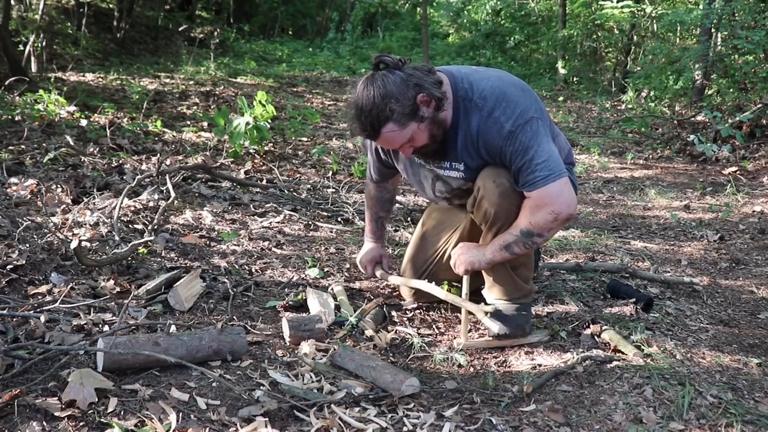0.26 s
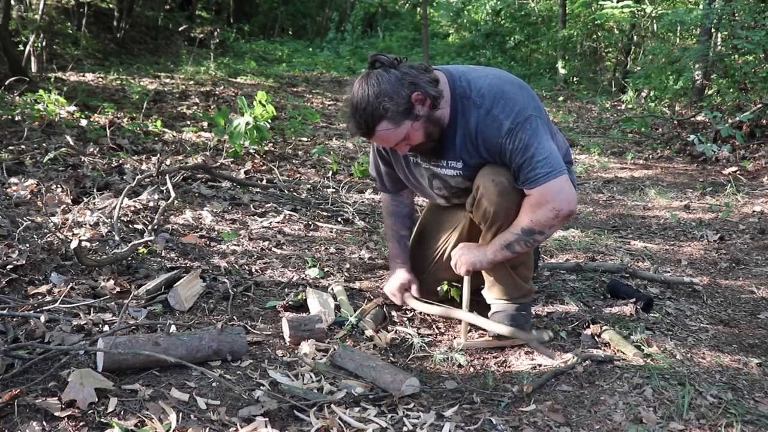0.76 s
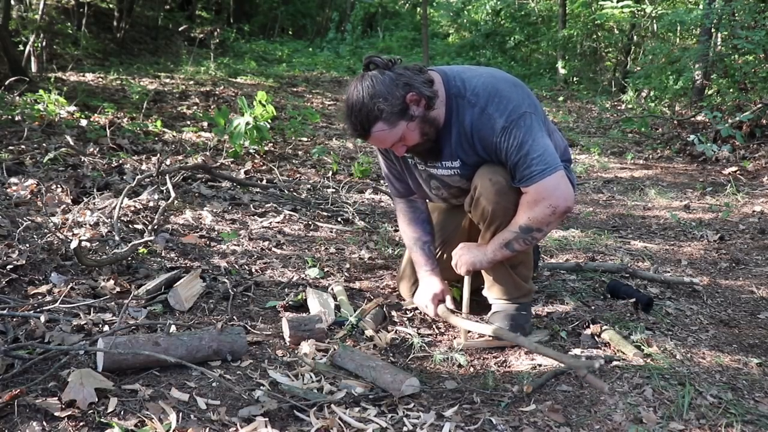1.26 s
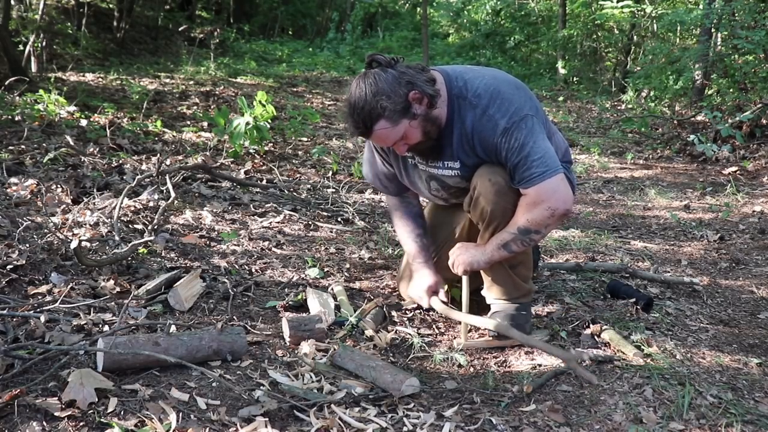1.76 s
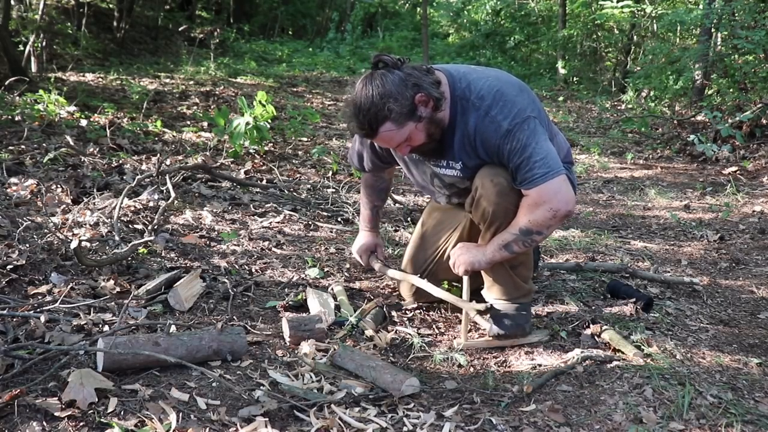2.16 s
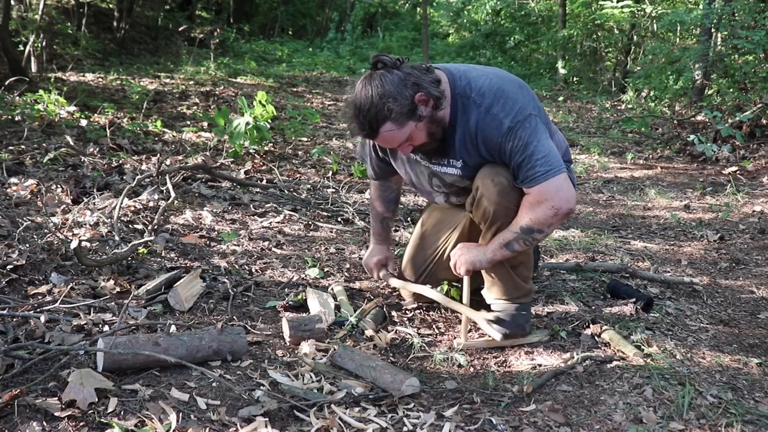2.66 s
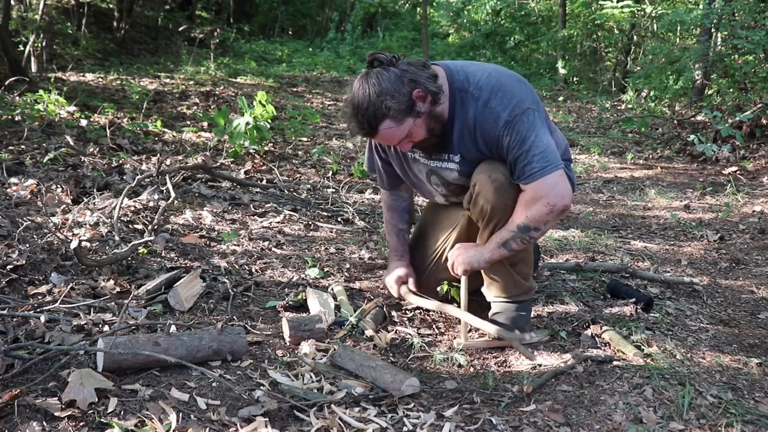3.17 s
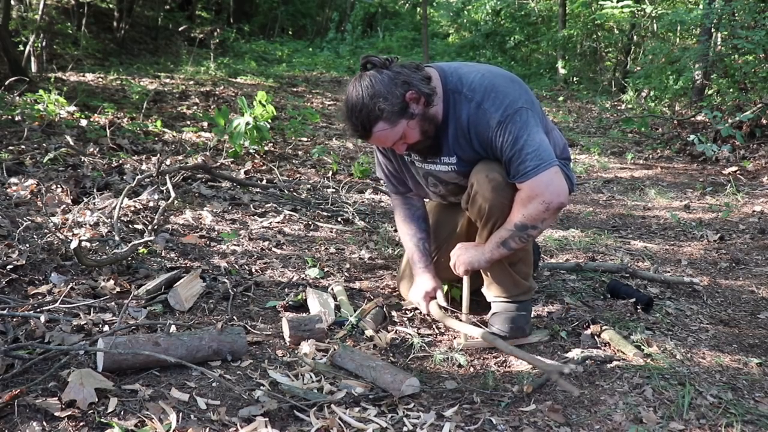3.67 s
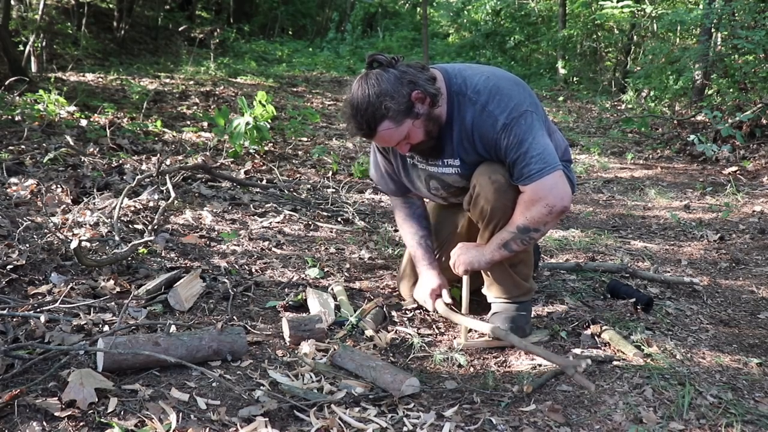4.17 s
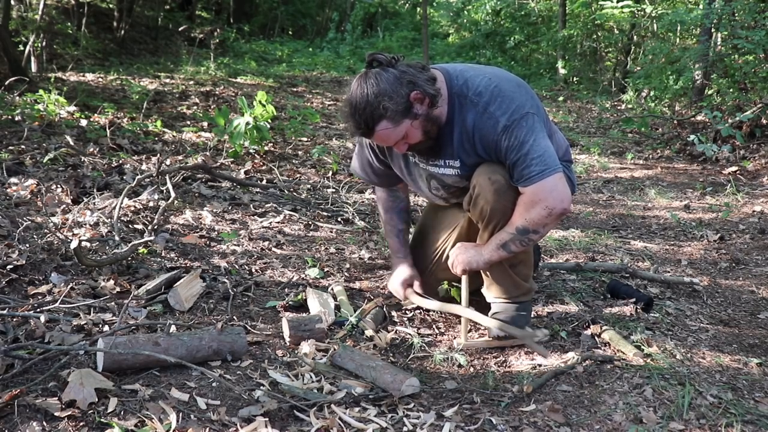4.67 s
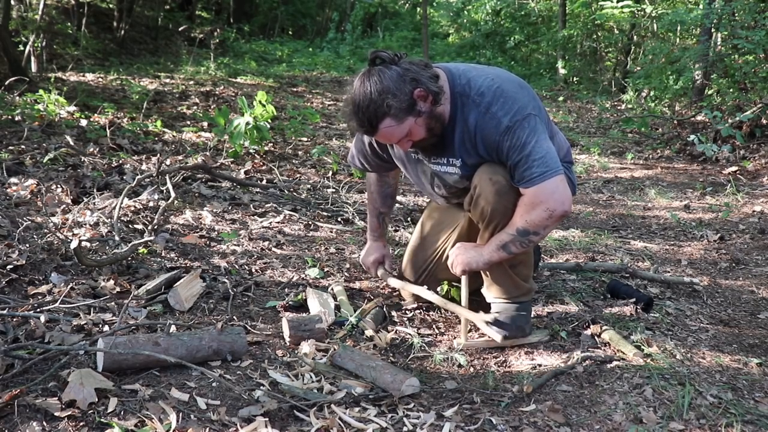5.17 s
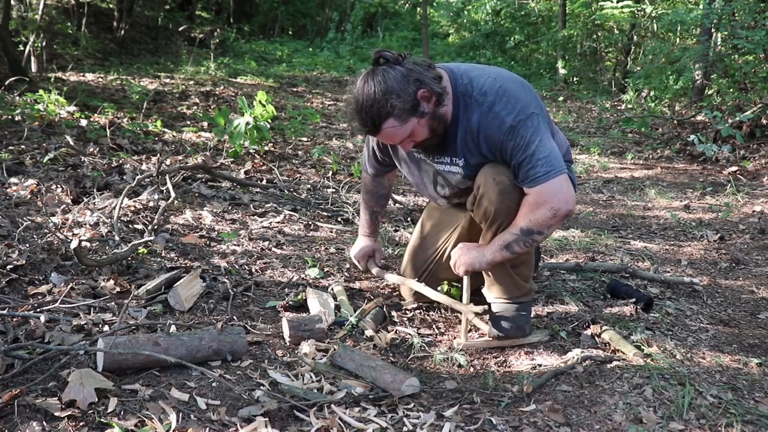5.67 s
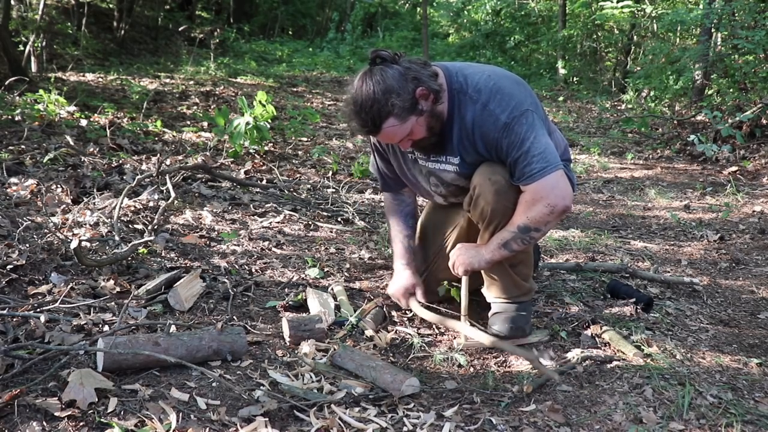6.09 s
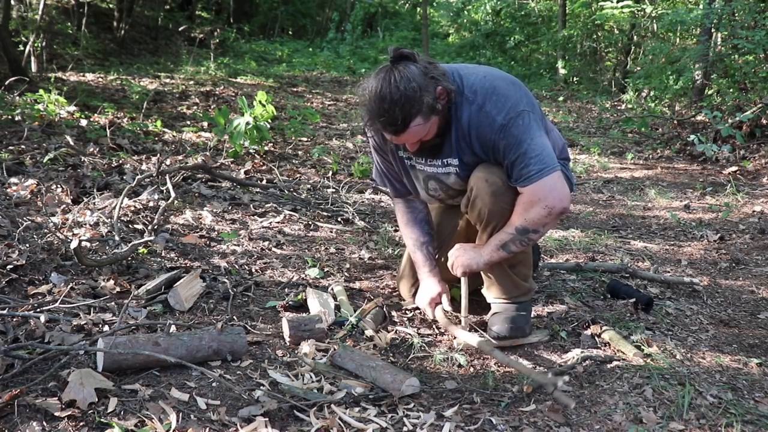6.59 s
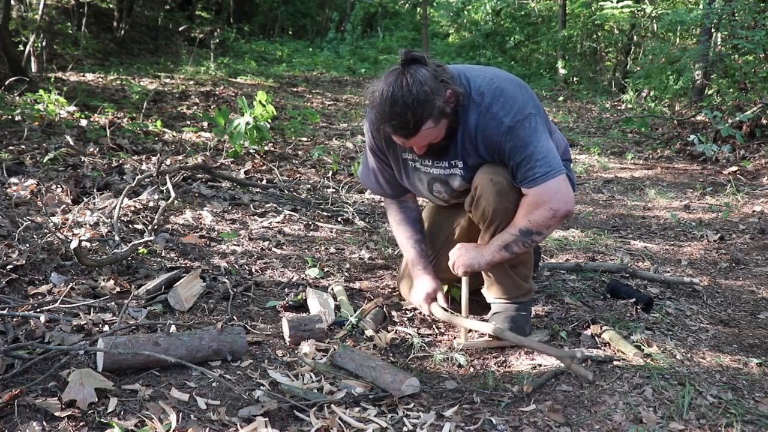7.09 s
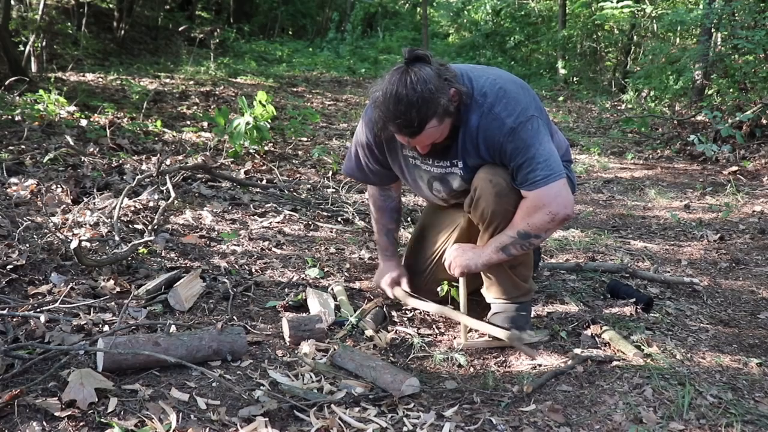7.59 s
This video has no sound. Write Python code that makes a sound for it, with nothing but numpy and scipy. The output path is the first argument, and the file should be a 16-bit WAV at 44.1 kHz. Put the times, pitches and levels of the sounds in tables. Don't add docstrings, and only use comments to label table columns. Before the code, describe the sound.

A bow drill works close by in a quiet, open wood, nearly without echo. Dry, hollow wooden rasps alternate push and pull, each about 0.2 seconds, a little over three per second, with tiny gaps. They grind low in the board, flutter with a fast knock at each spindle turn, and carry fine grit, crackle and hiss. The first two seconds are mostly plain rasping, with one hard wooden crack at 0.94. From about 1.9, reversals often stick, chatter in rapid bright clicks and lock into thin, very short squeaks, strong near 2.8, 3.7, 4.9, 5.8 and 6.1. Loud snaps catch around 5.1 and 5.7. Squeaking eases after 6.4, with a small one near 7.2, while sawing continues until the end. Very faint dove coos come around 1.5, 2.4, 3.3 and, higher, 7.2. A distant engine throbs deeply under soft air, slightly stronger towards the end.

```python
import sys
import numpy as np
from scipy import signal
from scipy.fft import rfft, irfft
from scipy.io import wavfile

SR = 44100
rng = np.random.default_rng(int(sys.argv[2]) if len(sys.argv) > 2 else 0)


def boost_factor(decibels):
    exponent = np.asarray(decibels, float) / 20
    return 10 ** exponent


def master(y):
    cut = np.clip(np.atleast_2d(y).T, -1, 1)
    pcm = np.round(cut * 32767)
    wavfile.write(sys.argv[1], SR, pcm.astype(np.int16))


N = 345826
CUTOFF_HZ = 15800

# start [s], end [s], rasp level [dB], grit level [dB].
STROKES = [(-0.2, 0.002, -21.5, -68), (0.096, 0.339, -25, -35.5), (0.416, 0.624, -27, -42),
           (0.721, 0.952, -25, -38), (1.04, 1.244, -24, -42.5), (1.34, 1.55, -22.5, -34.5),
           (1.641, 1.855, -24, -37.5), (1.938, 2.165, -23, -32.5), (2.242, 2.457, -27, -36.5),
           (2.558, 2.767, -25, -33.5), (2.87, 3.04, -24.5, -39.5), (3.15, 3.328, -25.5, -35),
           (3.416, 3.655, -28, -41), (3.723, 3.958, -25.5, -34.5), (4.047, 4.229, -22, -38),
           (4.324, 4.548, -24, -35.5), (4.63, 4.816, -23, -40.5), (4.915, 5.132, -22.5, -30.5),
           (5.22, 5.401, -21.5, -36.5), (5.5, 5.731, -23.5, -31.5), (5.8, 5.999, -25, -39),
           (6.081, 6.312, -25, -34), (6.41, 6.591, -20.5, -37), (6.693, 6.905, -25.5, -36),
           (6.999, 7.178, -22, -37.5), (7.272, 7.491, -25.5, -34.5), (7.58, 7.771, -22.5, -36)]


def at_times(rows):
    s, *columns = np.transpose(rows)
    return [np.interp(np.arange(N) / SR, s, c) for c in columns]


def unit(x):
    return x / np.sqrt(np.mean(x ** 2) + 1e-20)


def wander(per_s):
    r = np.exp(-2 * np.pi * per_s / SR)
    noise = rng.standard_normal(N + 9000)
    return unit(signal.lfilter([1], [1, -2 * r, r * r], noise)[9000:])


def grains(per_s, spread_db):
    sizes = boost_factor(spread_db * np.minimum(rng.exponential(1, N), 5))
    signs = rng.choice([-1, 1], N)
    return unit(sizes * signs * (rng.random(N) < per_s / SR)) + 1e-18


def puffs(times, heights, rise_s, fall_s):
    marks = np.zeros(N)
    marks[(np.asarray(times) * SR).astype(int)] = heights
    age = np.arange(int(0.06 * SR)) / SR
    shape = (1 - np.exp(-age / rise_s)) * np.exp(-age / fall_s)
    return signal.fftconvolve(marks, shape / shape.max())[:N]


def body(force, modes, shift_db, shift_per_s):
    out, power = 0, 0
    for k, (hz, width, db) in enumerate(modes):
        r = np.exp(-np.pi * width / SR)
        fed = force * boost_factor(shift_db * wander(shift_per_s))
        ringing = signal.lfilter([1, 0, -1], [1, -2 * r * np.cos(2 * np.pi * hz / SR), r * r], fed)
        out = out + (-1) ** k * boost_factor(db) * (1 - r * r) / 2 * ringing
        power += boost_factor(db) ** 2 * (1 - r * r) / 2
    return out / np.sqrt(power)


def stroke_levels():
    rasp_peak, grit_peak = (0.52, 0.5), (0.47, 0.64)
    swell_power, stop_power = (1.9, 4.2), (2.16, 4.64)
    time = np.arange(N) / SR
    rasp_db, grit_db = np.full(N, -90.), np.full(N, -90.)
    for k, (start, end, rasp_top, grit_top) in enumerate(STROKES):
        way = k % 2
        for level, place, top, drop in ((rasp_db, rasp_peak[way], rasp_top, 13),
                                        (grit_db, grit_peak[way], grit_top, 12)):
            middle = start + np.clip(place, 0.1, 0.9) * (end - start)
            rising = time < middle
            away = np.where(rising, (middle - time) / (middle - start), (time - middle) / (end - middle))
            power = np.where(rising, swell_power[way], stop_power[way])
            level[:] = np.maximum(level, top - drop * away ** power)
    return rasp_db, grit_db


def turn_knocks():
    # time [s], length of a turn [s], extra level [dB].
    knock_rows = [(0.222, 0.048, 5), (0.513, 0.03, 7.5), (0.842, 0.032, 6.5), (1.164, 0.03, 6),
                  (1.453, 0.031, 3), (1.763, 0.023, 6.5), (2.058, 0.034, 4.5), (2.348, 0.03, 9),
                  (2.657, 0.028, 5), (2.956, 0.022, 6), (3.248, 0.025, 6), (3.517, 0.033, 7.5),
                  (3.843, 0.029, 6), (4.13, 0.033, 4), (4.429, 0.036, 4.5), (4.745, 0.033, 7.5),
                  (5.026, 0.029, 3), (5.326, 0.0256, 7), (5.613, 0.026, 3.5), (5.924, 0.027, 7),
                  (6.195, 0.043, 6), (6.496, 0.025, 4), (6.78, 0.034, 4), (7.101, 0.026, 1.5),
                  (7.359, 0.032, 4.5), (7.692, 0.028, 4)]
    scatter_db, spin_up_s = 0.5, 0.03
    first_knock_db = (-0.5, -2.8)
    turns = np.arange(-4, 5)
    luck = rng.standard_normal((len(knock_rows), 9))
    s = np.array([at + turn_s * turns for at, turn_s, db in knock_rows])
    db = np.array(knock_rows)[:, 2:] + scatter_db * luck
    start, end = np.array(STROKES)[1:, :1], np.array(STROKES)[1:, 1:2]
    inside = (s > start + spin_up_s) & (s < end)
    stroke = np.arange(len(db))
    db[stroke, inside.argmax(axis=1)] += np.array(first_knock_db)[(stroke + 1) % 2]
    return s[inside], db[inside]


def rasp(rasp_db, grit_db):
    s, extra_db = turn_knocks()
    knock_db = 1.3 * puffs(s, extra_db, rise_s=0.003, fall_s=0.006)
    grip_db = 1.8 * wander(70)
    coarse = grains(6000, spread_db=1.5) * boost_factor(rasp_db + knock_db - 2.5 + grip_db)
    fine = grains(1500, spread_db=1.5) * boost_factor(grit_db + 0.47 * knock_db - 4.0 + grip_db)
    tear_level = signal.lfilter([1], [1, -0.96], np.abs(grains(170, spread_db=-5.5)))
    tears = tear_level * rng.standard_normal(N)
    crackle = unit(tears) * boost_factor(1.667 * grit_db + 11)
    dust_db = 0.68 * np.minimum(rasp_db, -36) - 23.5 + 2.0 * wander(99)
    dust = rng.standard_normal(N) * boost_factor(dust_db)
    highpass = signal.butter(2, 6500, "high", fs=SR, output="sos")
    hiss = signal.sosfilt(highpass, dust + crackle)
    return coarse, fine + boost_factor(8) * crackle, hiss


def swell_db(since, length, peak):
    build_db_per_s, ease_db_per_s = 402, 300
    top = np.clip(peak, 0, 1) * length
    return np.where(since < top, build_db_per_s * (since - top), ease_db_per_s * (top - since))


def chatter():
    # time [s], bright
    # level [dB], spindle level [dB].
    run_bursts = [(2.4737, -26, -27), (2.4775, -22, -23), (2.4823, -19, -21), (2.5011, -25, -29),
                       (2.504, -26, -28), (2.508, -22, -22), (2.512, -17, -23), (2.5157, -19, -21),
                       (2.5192, -22, -22), (2.5241, -21, -22), (2.5277, -20, -23), (2.5326, -13, -25),
                       (2.806, -31, -27), (2.81, -24, -29), (2.814, -20, -25), (2.818, -24, -27), (2.8233, -24, -29),
                       (2.829, -26, -27), (2.8333, -31, -24), (2.8376, -23, -29), (3.071, -18, -27),
                       (3.0776, -16, -26), (3.0956, -29, -31), (3.0992, -31, -35), (3.105, -20, -26),
                       (3.1079, -18, -29), (3.1116, -18, -24), (3.348, -21, -25), (3.3521, -18, -20),
                       (3.3574, -21, -22), (3.3612, -22, -27), (3.3788, -19, -22), (3.3826, -20, -22),
                       (3.3868, -17, -22), (3.3903, -17, -20), (3.3968, -16, -23), (3.4008, -23, -27),
                       (3.4039, -24, -29), (3.408, -28, -32), (3.639, -29, -25), (3.643, -25, -33), (3.647, -20, -31),
                       (3.6521, -15, -29), (3.6567, -13, -22), (3.6622, -15, -24), (3.6834, -15, -31),
                       (3.6861, -14, -24), (3.6892, -9, -19), (3.6954, -16, -29), (4.2511, -29, -36),
                       (4.2556, -22, -25), (4.2607, -16, -24), (4.2791, -26, -38), (4.2832, -26, -33),
                       (4.2861, -17, -27), (4.2904, -17, -19.5),
                       (4.2943, -21, -23), (4.3078, -22, -18.5), (4.5712, -30, -37), (4.5744, -20, -25),
                  (4.5787, -18, -22.5), (4.5846, -16, -23), (4.5892, -17, -21), (4.5947, -19, -25),
                  (4.8438, -27, -21), (4.8467, -26, -32), (4.849, -21, -30), (4.8537, -17, -24),
                  (4.8588, -16, -21), (4.8738, -24, -38), (4.8758, -18, -26), (4.8786, -11, -27),
                  (4.882, -13, -23), (4.888, -14, -27), (5.43, -19, -40), (5.4376, -15, -19.5),
                  (5.4421, -17, -17), (5.4592, -32, -36), (5.4615, -16, -21), (5.465, -13, -20),
                  (5.4674, -12, -24), (5.471, -16, -25), (5.7598, -25, -27), (5.768, -21, -33), (6.017, -18, -28),
                  (6.0214, -14, -24), (6.0259, -15, -22), (6.0306, -15, -22), (6.0469, -20, -27),
                  (6.0492, -23, -25.5), (6.0568, -16, -23.5), (6.062, -15, -15), (6.3472, -30, -33),
                  (6.351, -26, -26), (6.356, -27, -28), (6.3614, -26, -29), (6.3668, -25, -27), (6.375, -21, -23),
                  (6.38, -13, -19), (6.386, -11, -19.5), (6.3913, -12, -16), (6.6484, -25, -28),
                  (6.6526, -22, -28), (6.6565, -22, -26), (6.6596, -23, -31), (6.6646, -21, -23),
                  (6.669, -27, -27), (7.2347, -25, -32), (7.247, -21, -23.5), (7.8269, -23.5, -37),
                  (0.985, -35, -29), (0.991, -30, -23.5), (0.9968, -30, -24)]
    gap_s, drag_db = 0.008, -9
    bright_db, spindle_db = -0.5, 1.5
    run = [(s, b + bright_db, d + spindle_db) for s, b, d in sorted(map(tuple, run_bursts))]
    drag = np.zeros((2, N))
    for (s, *db), (next_s, *next_db) in zip(run, run[1:]):
        if next_s - s < gap_s:
            span = np.arange(int(s * SR), int(next_s * SR))
            drag[:, span] = boost_factor(np.linspace(db, next_db, len(span)).T + drag_db)
    return run, drag


def slipping():
    # time [s], bright level [dB], spindle level [dB].
    snaps = [(.748, -46, -29), (.777, -44, -25), (.788, -38, -22), (.815, -42, -18), (.874, -46, -27),
             (.909, -48, -28), (0.274, -36, -16.5), (0.7997, -35, -20), (0.8242, -31, -19),
             (0.852, -38, -28), (1.3956, -35, -18.5), (2.0429, -24, -19.5), (2.048, -39, -13),
             (2.1083, -26, -15.5), (2.627, -32, -21), (2.656, -39, -17), (2.7034, -31, -30),
             (3.2473, -28, -21), (3.27, -30, -19), (4.5133, -30, -14), (4.524, -37, -16),
             (5.0236, -44, -25), (5.0675, -47, -27), (5.0765, -39, -26), (5.5286, -30, -15),
             (5.6517, -41, -18), (5.659, -27, -13), (5.6736, -30, -9.5), (5.6871, -25, -28),
             (5.6948, -36, -14), (5.7045, -32, -18), (6.1076, -24, -24), (6.15, -33, -17),
             (6.8312, -38, -16.5), (7.341, -28, -24), (7.3737, -29, -43)]
    slips = [(6.343, -36, -29), (3.677, -40, -27), (7.1, -27, -25), (5.4555, -38, -25), (4.275, -33, -30),
             (7.823, -31, -29.5), (7.8295, -24, -29), (7.23, -30, -26), (.98, -48, -40), (3.074, -23, -23),
             (5.9, -27, -30), (6.3725, -24, -24), (.9369, -17.5, -18), (.951, -42, -29), (6.64, -32, -33),
             (7.226, -38, -31), (0.337, -48, -15.5), (0.6693, -25.5, -27.5), (.004, -59, -49),
             (2.744, -44, -24), (5.279, -45, -41), (6.178, -34, -38), (4.988, -32, -39), (4.996, -36, -20),
             (6.336, -38, -28), (1.5286, -26, -13.5), (1.592, -30, -29.5), (2.1591, -22, -12),
             (0.28, -40, -22), (1.361, -40, -25), (3.968, -26, -26), (3.987, -36, -31), (4.555, -28, -25),
             (5.0979, -21, -6), (5.1058, -13, -5.5), (5.1533, -23, -22), (5.17, -28, -27),
             (5.7425, -23, -25), (5.7966, -31, -20.5), (6.2715, -21, -12), (6.2815, -36, -17),
             (6.2896, -30, -14.5), (6.6127, -28, -27.5), (7.473, -42, -18.5), (7.5236, -27, -28)]
    # start [s], length [s], peak place [0-1], bright level [dB], spindle level [dB].
    murmurs = [(0.681, 0.009, 0.3, -42, -35), (1.292, 0.008, 0.5, -42, -33.5),
               (1.878, 0.0052, 0.2, -25, -28), (1.898, 0.0074, 0.4, -23.5, -23.5),
               (2.781, .007, .4, -30, -30), (6.941, 0.0059, 0.1, -37, -34), (0.826, 0.034, 0.52, -42, -25),
               (.24, .06, .6, -50, -30), (5.63, .06, .6, -46, -25), (1.46, .06, .7, -48, -27),
               (6.829, 0.022, 0.27, -44, -23.5), (0.3, 0.0042, 0.4, -44, -35),
               (7.278, .014, 0.34, -46, -30), (5.05, 0.059, 0.5, -44, -26), (6.888, 0.0086, .4, -49, -34)]
    slip_gap_s, gap_spread, scatter_db, between_db = 0.0043, 0.134, 1.5, -6
    count = np.arange(16)
    run, (bright, spindle) = chatter()
    rows = snaps + slips + run
    for start, length, peak, bright_db, spindle_db in murmurs:
        gap, scatter = rng.standard_normal((2, 16))
        since = slip_gap_s * (count + gap_spread * np.cumsum(gap * (count > 0)))
        level = swell_db(since, length, peak) + scatter_db * scatter
        rows = rows + [(start + t, bright_db + db, spindle_db + db)
                       for t, db in zip(since, level) if t < length]
        span = np.arange(int(start * SR), min(int((start + length) * SR), N))
        drag = boost_factor(2.4 * swell_db(span / SR - start, length, peak) + between_db)
        bright[span] += drag * boost_factor(bright_db)
        spindle[span] += drag * boost_factor(spindle_db)
    s, bright_db, spindle_db = np.transpose(rows)
    bright += puffs(s, boost_factor(bright_db), rise_s=0.00054, fall_s=0.00093)
    spindle += puffs(s, boost_factor(spindle_db), rise_s=0.00022, fall_s=0.0012)
    force = grains(18000, spread_db=1.8) * boost_factor(1.5 * wander(310))
    return force * bright, force * spindle


def ring_board(force):
    # resonance [Hz], width [Hz], level [dB].
    board_modes = [(154.5, 34.6, -9), (257.6, 30, -3.5), (306.8, 27, 2.5), (392.7, 38, -4), (655, 100, -3),
                   (798, 173, -3.5), (887, 131, -4), (1073, 207, -12), (1540, 416, -16.5)]
    return body(force, board_modes, shift_db=1.2, shift_per_s=30)


def ring_socket(force):
    # resonance [Hz], width [Hz], level [dB].
    socket_modes = [(1561, 37, -1), (2147, 157, 4), (2603, 165, 1), (3090, 370, -2.5), (4700, 950, -7),
                    (5920, 890, -9)]
    return body(force, socket_modes, shift_db=2.5, shift_per_s=106)


def ring_spindle(dull, bright):
    # resonance [Hz], width [Hz], level [dB].
    main_modes = [(1370, 300, -3), (2530, 320, -7), (3600, 880, 4), (5040, 610, 4.5), (5700, 500, 7.5),
                  (7170, 990, 0.5)]
    top_modes = [(9520, 490, -1), (10260, 350, 1.5), (12370, 1100, 0), (14300, 320, 1), (16900, 780, 5.5)]
    main = body(dull, main_modes, shift_db=2.5, shift_per_s=33)
    return main + body(bright, top_modes, shift_db=2.6, shift_per_s=105)


def squeaks():
    # start [s], length [s], start pitch [Hz], end pitch [Hz], level [dB].
    squeak_rows = [(1.904,.03,3370,3600,-26), (2.471,0.011,3380,3430,-30), (2.508,0.028,6050,5700,-20),
                   (2.533,.03,3600,3660,-24), (2.812,0.019,3570,3550,-22), (2.835,0.047,2980,3700,-18),
                   (3.111,0.032,3600,3670,-21.5), (3.405,0.043,3600,3640,-22),
                   (3.641,0.022,3640,3640,-16.5), (3.696,0.034,3330,3630,-15), (3.989,0.043,3540,3630,-25),
                   (4.25,0.013,3550,3570,-25), (4.289,.03,5520,5880,-20), (4.588,0.038,3340,3600,-18.5),
                   (4.841,.008,5640,5440,-22.5), (4.886,0.027,3480,3640,-18), (5.171,0.042,3530,3630,-25.5),
                   (5.423,.01,6950,6150,-32), (5.473,.023,4630,3950,-16), (5.762,0.046,3542,3680,-14),
                   (6.012,.016,3600,3500,-21), (6.062,0.029,5020,6770,-14.5), (6.391,0.032,3300,3640,-22),
                   (7.234,0.011,3530,3500,-22.5), (7.242,.011,5800,6400,-26)]
    # peak place [0-1], second partial [dB], higher partials [dB], unrest [0-5].
    voices = [(0.14,-14,-18,1.1), (.5,2,-3,3), (.4,0,-20,4.5), (.3,-5,-12,1.1), (0.6,-10,-20,2.1),
              (.25,-5,-17,1.9), (.25,-5,-20,1.1), (0.3,-8,-10,1.5), (0.7,-10,-12,2.2), (0.24,-11,3.5,0.89),
              (.3,-20,-40,.8), (.5,-11,-12,2.2), (0.6,-7,-25,4), (.5,-3,-12,2.8), (.5,-7,-30,1.1),
              (0.13,-8,-3,1.2), (.3,-16,-35,.8), (.5,8,-30,1.5), (0.24,-15,-5,1.9), (0.44,-10,-14.5,0.87),
              (.7,-8,-8,3), (.3,-4,-25,2.5), (0.13,3,-4,1.5), (0.26,-6.5,-9,2.9), (.3,-3,-20,3)]
    lock_hz, tremble_hz = 3850, 36
    settle, fade_db = (5.2, 2.38), (-23.5, -9.5)
    rise_db, partial_fade_db = -9, -12
    out, tremble, waver = np.zeros(N), wander(260), wander(200)
    band = signal.butter(1, [2500, 12000], "band", fs=SR, output="sos")
    scrape = signal.sosfilt(band, grains(6000, spread_db=2.5))
    for (start, length, start_hz, end_hz, db), (peak, second_db, higher_db, unrest) in zip(squeak_rows, voices):
        span = np.arange(int(start * SR), int((start + length) * SR))
        along = np.linspace(0, 1, len(span))
        peak = np.clip(peak, 0.05, 0.9)
        before = np.maximum(1 - along / peak, 0)
        after = np.maximum(along - peak, 0) / (1 - peak)
        free = int(end_hz > lock_hz)
        glide_hz = (start_hz - end_hz) * np.exp(-settle[free] * along)
        hz = end_hz + glide_hz + tremble_hz * unrest * tremble[span]
        turn = 2 * np.pi * np.cumsum(hz) / SR
        tone = np.sin(turn)
        for k, level in ((2, second_db), (3, higher_db), (4, higher_db - 4)):
            partial_db = level + partial_fade_db * (k - 1 - free) * after
            partial_db = partial_db + 3 * np.minimum(tremble[span - 300 * k], 1)
            tone = tone + boost_factor(partial_db) * np.sin(k * turn + k) * (k * hz < CUTOFF_HZ)
        shape_db = rise_db * before ** 2 + fade_db[free] * after ** 0.96
        shape_db = shape_db + 1.7 * unrest * np.minimum(waver[span], 1)
        edges = np.minimum(1, along / 0.054) * np.minimum(1, (1 - along) / 0.083)
        out[span] += boost_factor(db + shape_db) * edges * (tone + boost_factor(-11.5) * scrape[span])
    return out


def crack():
    # mode [Hz], level [dB], time to fall 60 dB [s].
    crack_modes = [(940, -5, 0.027), (2099, -11, .015), (2611, -4.5, 0.021), (3424, -12, .014),
                   (4204, -4, 0.015), (5286, -1, .006), (6223, -12, .01)]
    start, level_db = int(0.9371 * SR), -12.5
    out, age = np.zeros(N), np.arange(SR // 20) / SR
    for hz, db, t60 in crack_modes:
        out[start:start + len(age)] += boost_factor(level_db + db - 60 * age / t60) * np.sin(2 * np.pi * hz * age)
    return out


def dove():
    # start [s], length [s], pitch [Hz], level [dB].
    coos = [
        (1.5, 0.41, 466, -47),
        (2.42, .42, 466, -47.5),
        (3.33, .32, 464, -47),
        (7.23, 0.38, 511, -45.5),
    ]
    out, waver = np.zeros(N), wander(8.2)
    for start, length, hz, db in coos:
        span = np.arange(int(start * SR), int((start + length) * SR))
        swell = np.abs(np.sin(np.linspace(0, np.pi, len(span)))) ** 0.5
        tone = np.sin(2 * np.pi * hz * span / SR + 0.3 * waver[span])
        out[span] = boost_factor(db + 1.5 * waver[span]) * swell * tone
    return out


def engine():
    # time [s], pitch [Hz], level [dB].
    hum_curve = [(0, 25.47, -59), (3.4, 31, -50), (4.3, 36, -50), (4.74, 29.8, -57), (5.26, 32.33, -46),
                 (6.5, 32.95, -50), (7.3, 35.3, -44), (7.55, 41.5, -45.5), (7.84, 40.7, -41)]
    hum_hz, hum_db = at_times(hum_curve)
    turn = 2 * np.pi * np.cumsum(hum_hz + 1.78 * wander(3.2)) / SR
    return np.sin(turn) * boost_factor(hum_db + 4 + 1.3 * wander(8.3))


def woods():
    # frequency [Hz], level per Hz [dB].
    air_colour = [(45, 0.5), (86, -8.5), (200, -7), (400, -7.5), (1260, -21), (5700, -22), (8200, -33),
                  (15000, -80)]
    hz = np.maximum(np.arange(N // 2 + 1) * SR / N, 10)
    colour_hz, colour_db = np.transpose(air_colour)
    colour = boost_factor(np.interp(np.log(hz), np.log(colour_hz), colour_db))
    air = unit(irfft(rfft(rng.standard_normal(N)) * colour, N))
    return boost_factor(-46 + 1.5 * wander(4.4)) * air


def scene():
    rasp_db, grit_db = stroke_levels()
    coarse, fine, hiss = rasp(rasp_db, grit_db)
    bright, dull = slipping()
    turning = np.clip((rasp_db + 44) / 10, 0, 1)
    board = ring_board(coarse + boost_factor(-10.5) * dull)
    socket = ring_socket(fine + boost_factor(-13.5 + 8.5 * turning) * dull)
    spindle = ring_spindle(boost_factor(-6 * turning) * dull, bright)
    fire_drill = board + socket + spindle + hiss + squeaks() + crack()
    return (fire_drill + dove() + engine() + woods())[None]


def band_limit(x):
    return signal.sosfilt(signal.butter(12, 16970, fs=SR, output="sos"), x)


def record(dry):
    rounded = 0.48 * np.tanh(dry / 0.48)
    cut = signal.sosfilt(signal.ellip(9, 0.5, 50, CUTOFF_HZ, fs=SR, output="sos"), rounded)
    leak = signal.sosfilt(signal.ellip(8, 0.5, 70, 16870, fs=SR, output="sos"), rounded)
    return band_limit(cut + boost_factor(-55.0) * leak)


dry = scene()
out = record(dry)
master(out)
```